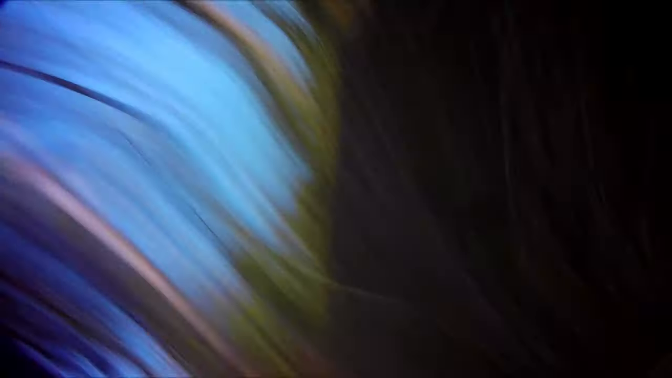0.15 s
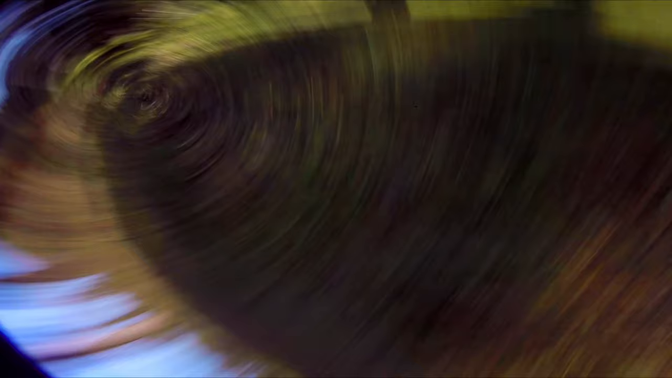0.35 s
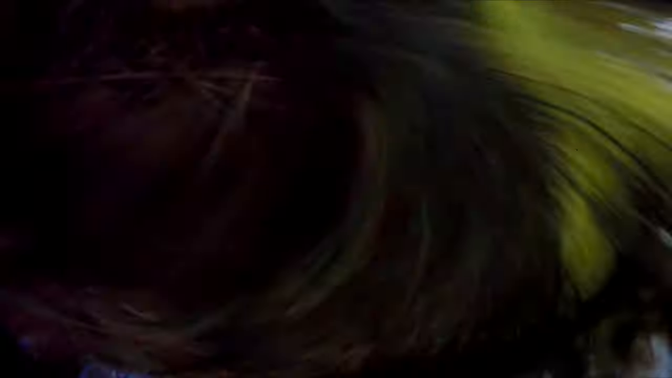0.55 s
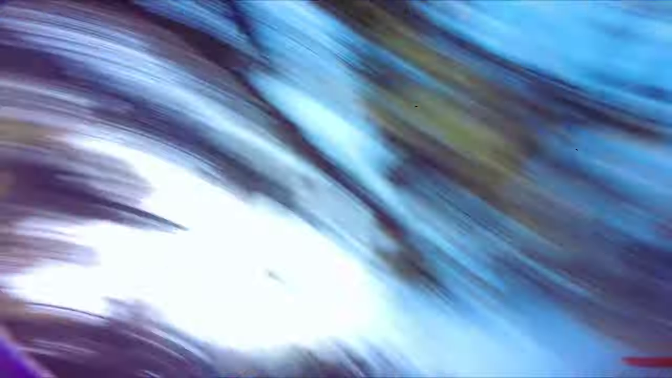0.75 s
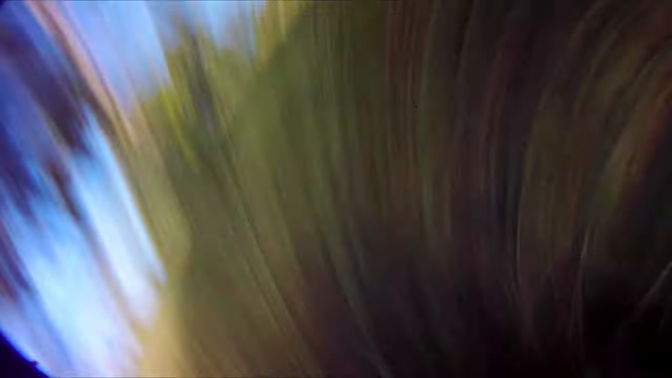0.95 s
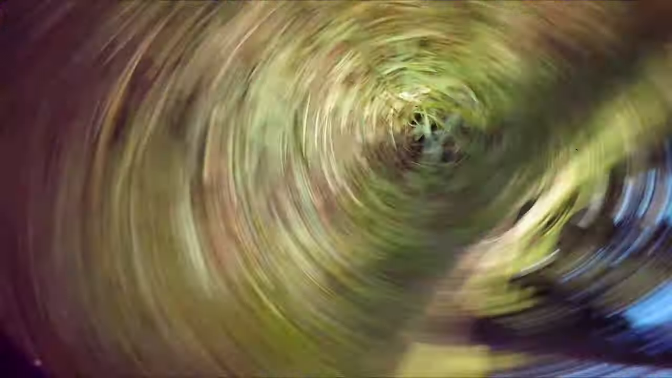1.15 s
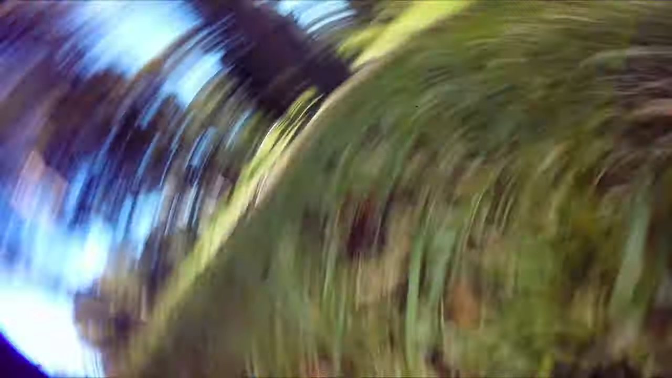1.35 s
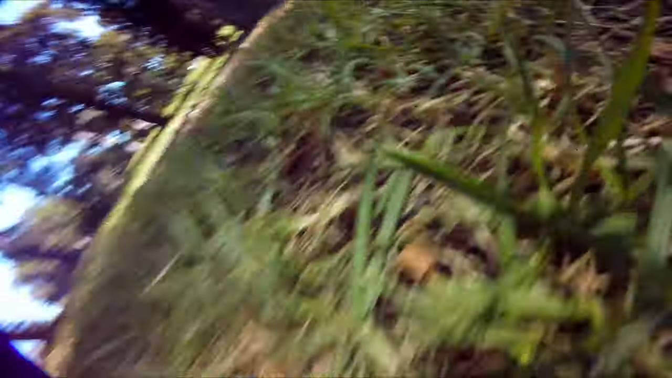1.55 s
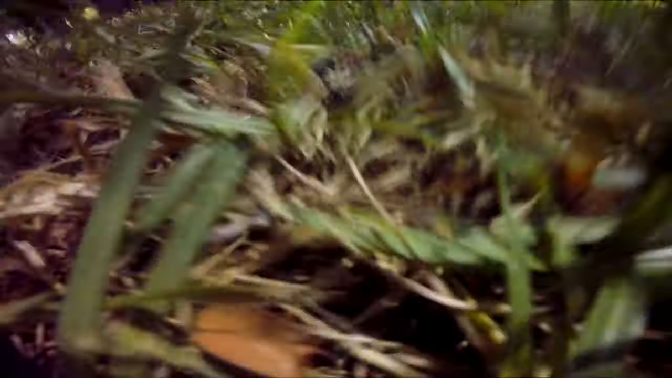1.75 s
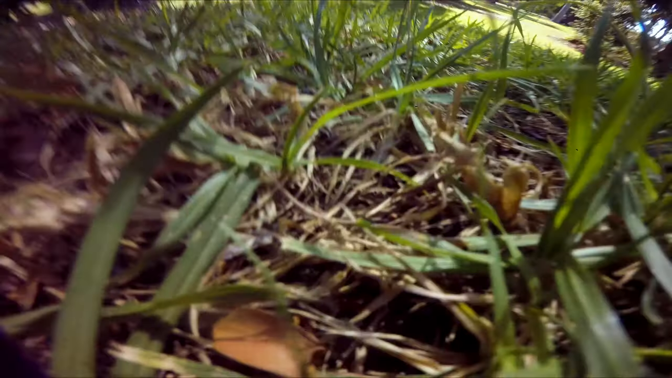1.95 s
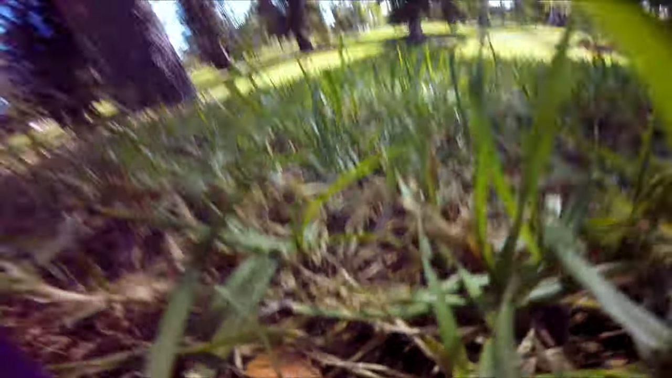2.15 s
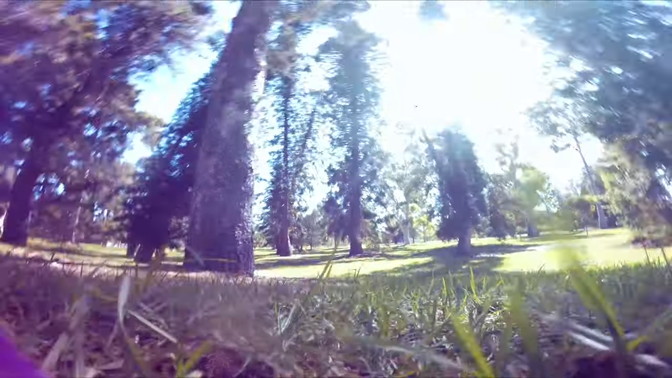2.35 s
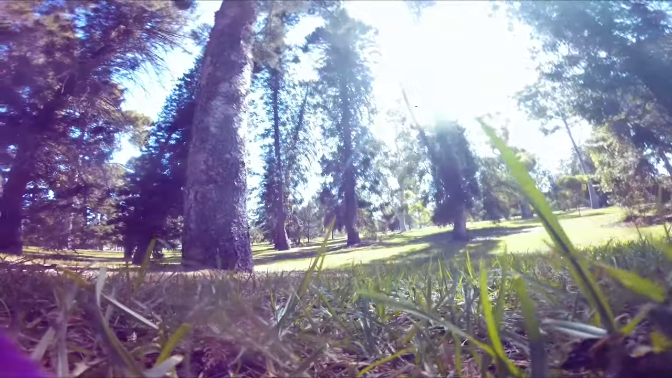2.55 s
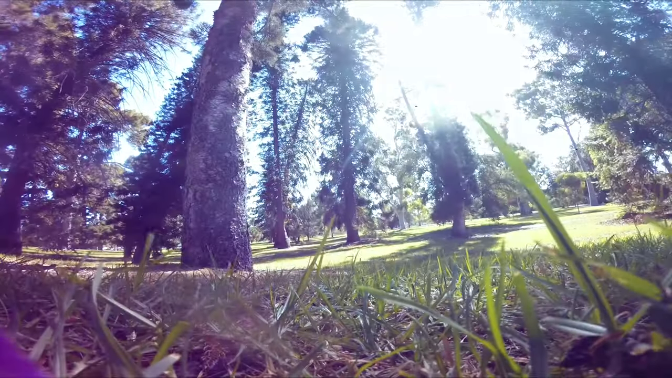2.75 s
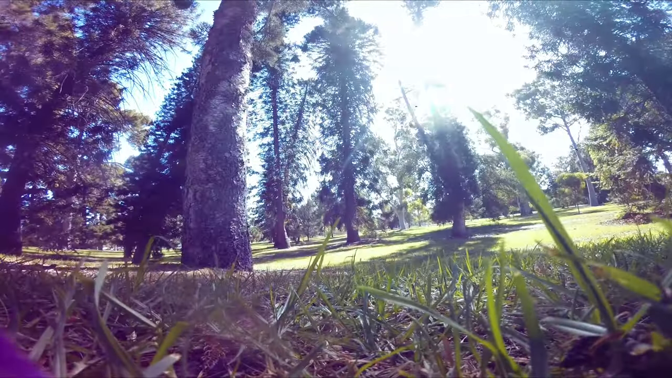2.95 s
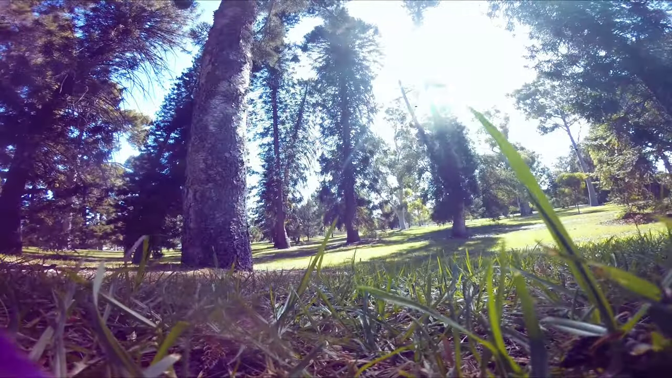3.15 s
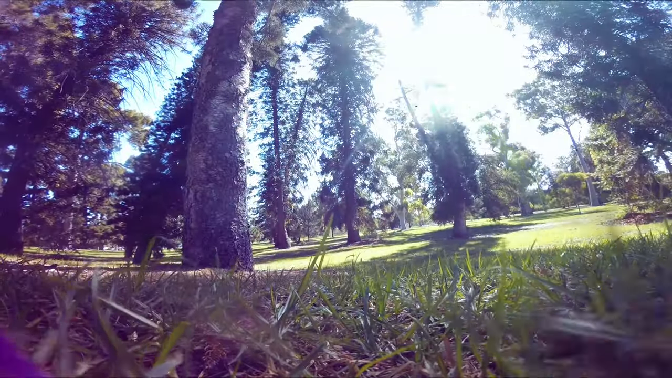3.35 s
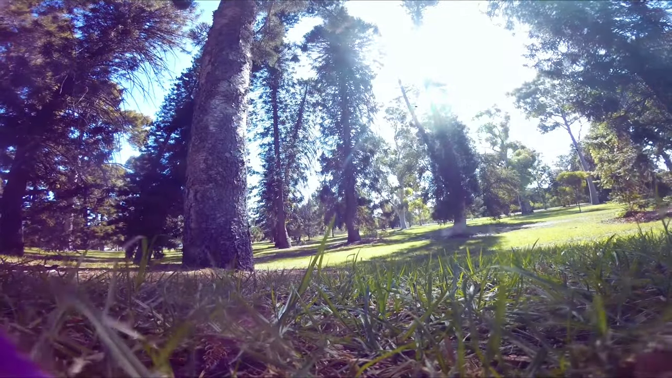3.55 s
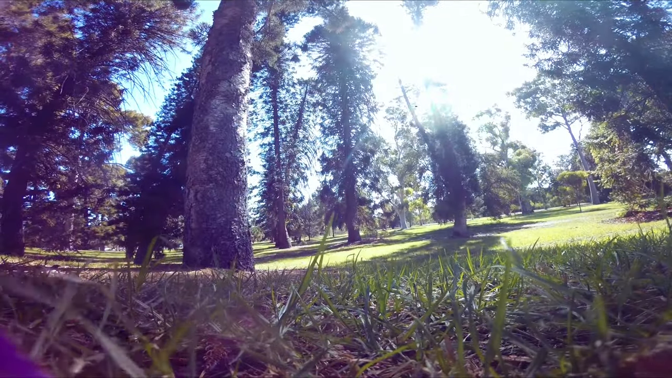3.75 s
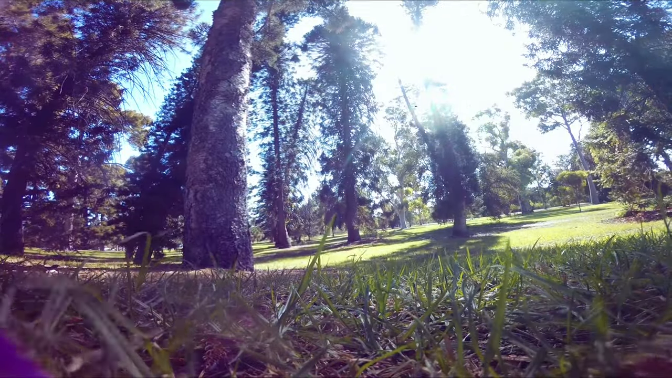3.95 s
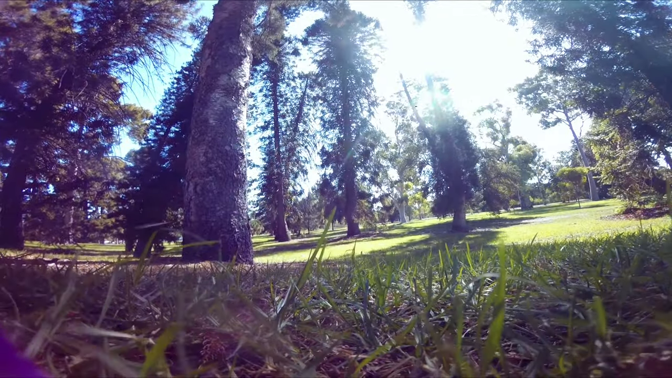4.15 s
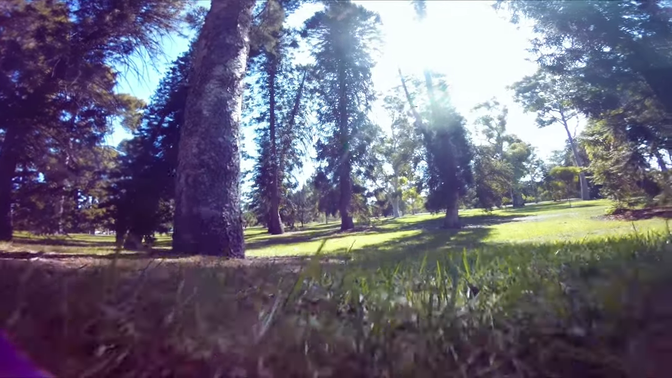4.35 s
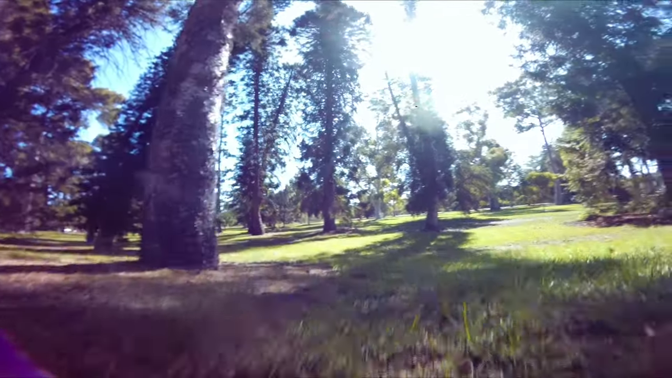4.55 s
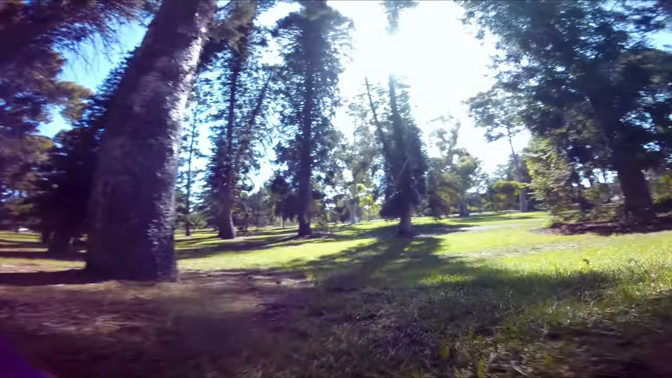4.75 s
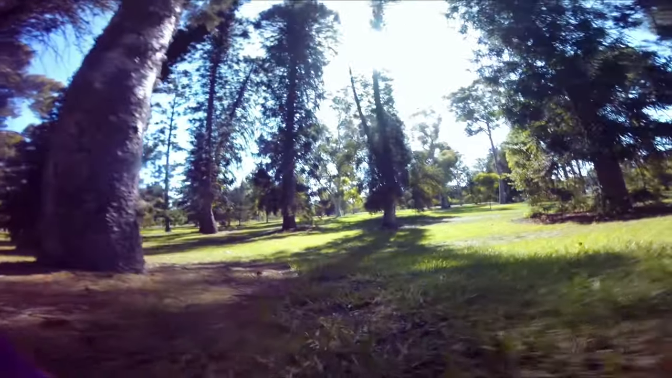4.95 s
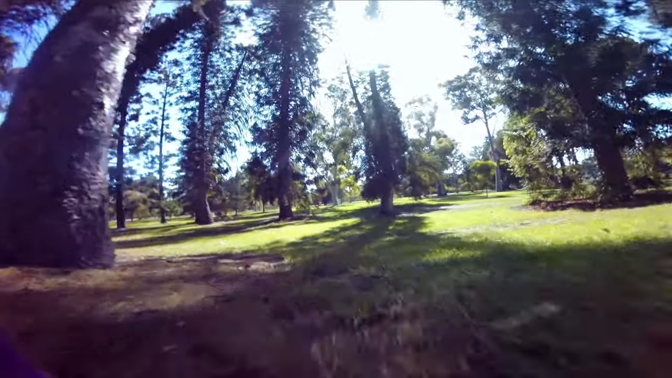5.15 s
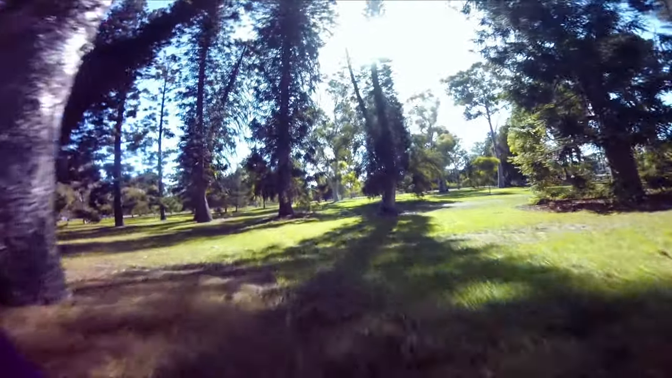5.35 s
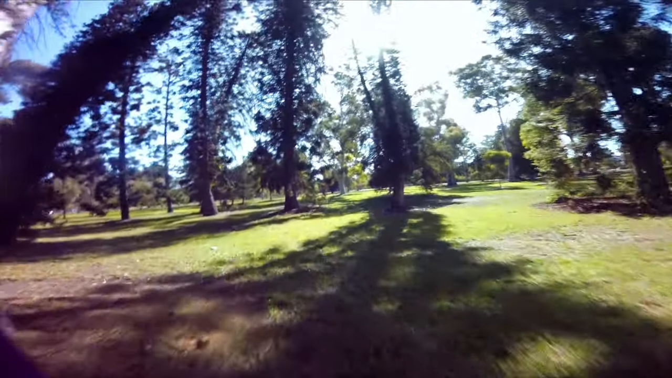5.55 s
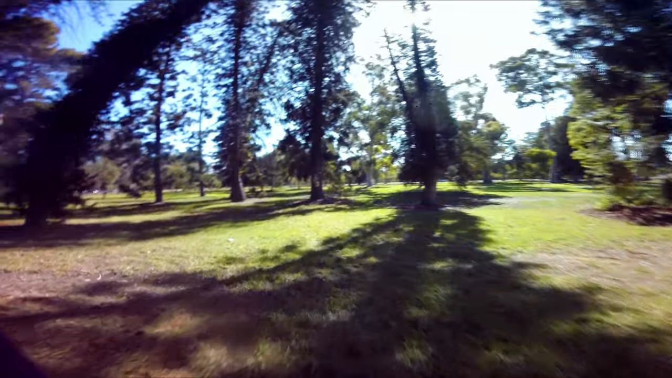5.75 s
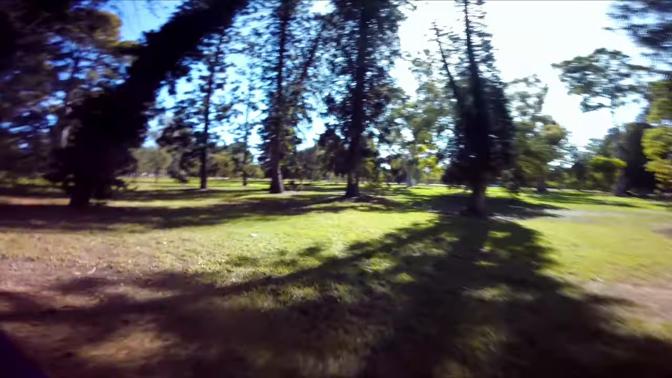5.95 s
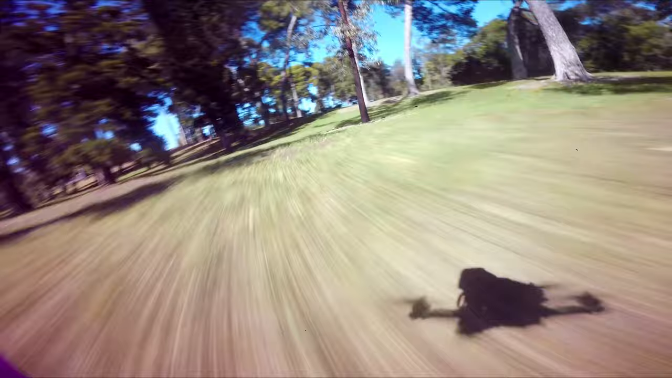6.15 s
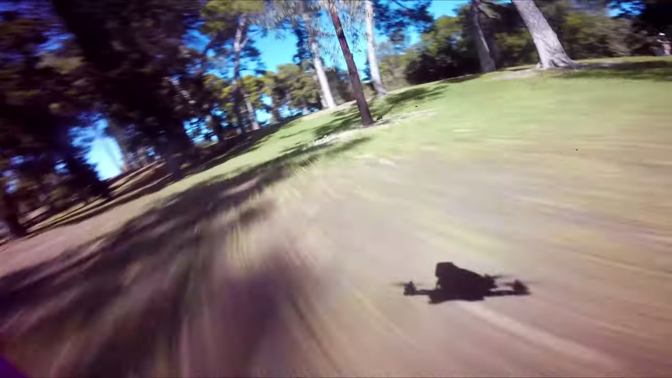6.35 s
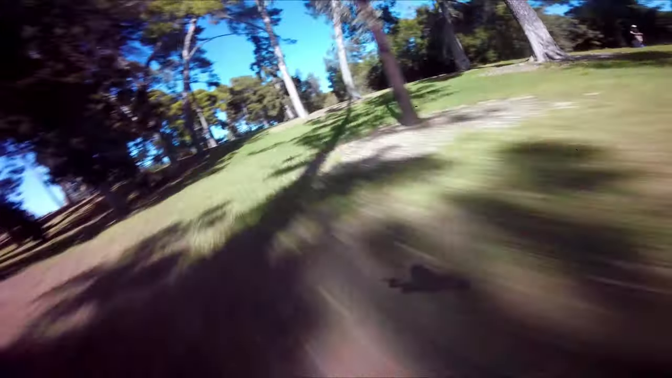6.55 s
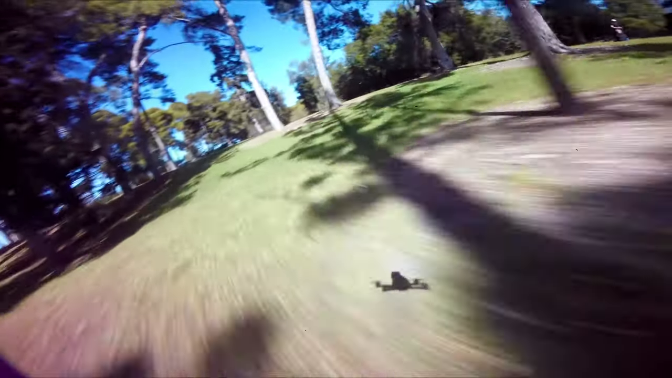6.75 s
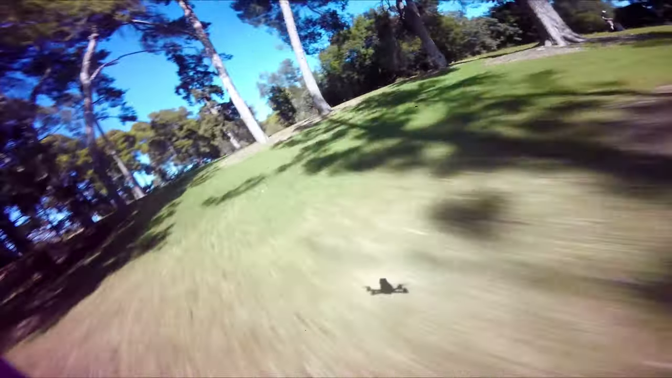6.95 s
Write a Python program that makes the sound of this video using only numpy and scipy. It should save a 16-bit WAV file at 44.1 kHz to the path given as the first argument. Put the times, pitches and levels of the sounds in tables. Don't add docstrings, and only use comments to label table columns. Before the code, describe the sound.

Heard from a microphone fixed to a small quadcopter outdoors: hollow knocks, heavy low jolts, grass scrapes and snapping stalks as it tumbles in bursts and rolls upright. A quiet pause with faint, pulsing motor hum follows. Abruptly the propellers thrash grass, labour and lift off with a buzzing whine that rises, dips and climbs. A final cut brings fast flight, a rough, beating multi-propeller drone with low headwind.

```python
import sys
import numpy as np
from scipy import signal
from scipy.fft import rfft, irfft
from scipy.io import wavfile
from scipy.ndimage import uniform_filter1d, map_coordinates

SR = 44100
rng = np.random.default_rng(int(sys.argv[2]) if len(sys.argv) > 2 else 0)


def transcribe(signal):
    frames = np.atleast_2d(signal).T
    limited = np.clip(frames, -1, 1)
    pcm = np.round(limited * 32767).astype(np.int16)
    wavfile.write(sys.argv[1], SR, pcm)


def how_loud(loudness_db):
    steps = np.asarray(loudness_db, float) / 20
    return 10 ** steps


N = 308700
CHOPPING_S, CRUISE_S = 3.408, 6.215
USUAL_HZ = 190


def curves(rows):
    s, *cols = np.transpose(rows)
    t = np.arange(N) / SR
    gate = np.clip(np.minimum(t - s[0], s[-1] - t) / .0005 + 2.5, 0, 1)
    return [gate] + [np.interp(t, s, c) for c in cols]


def span(start_s, end_s):
    return curves([(start_s, 0), (end_s, end_s - start_s)])


def humps(rows, rise=1):
    t = np.arange(N) / SR
    s, db, fall_s = np.transpose(rows)[..., None]
    fall_s = np.maximum(fall_s, .01)
    coarse = t[::32]
    hold = 0.19
    away = np.maximum((coarse - s) / fall_s - hold, (s - coarse) / (rise * fall_s))
    power = np.sum(how_loud(db - 20 * np.maximum(away, 0)) ** 2, axis=0)
    return np.interp(t, coarse, np.sqrt(power))


def wobble(rate_hz, size=N):
    knots = rng.standard_normal(int(size * rate_hz / SR) + 4)
    return map_coordinates(knots, [np.arange(size) * rate_hz / SR])


def rush(spectrum, band_hz, gain=1):
    f, db = np.transpose(spectrum)
    hz = np.fft.rfftfreq(N, 1 / SR)
    colour = how_loud(np.interp(np.log(hz + 1), np.log(f), db, -120, -120))
    z = rfft(gain * rng.standard_normal(N)) * colour
    inside = np.sum(abs(z[(hz > band_hz[0]) & (hz < band_hz[1])]) ** 2) * 2
    return irfft(z, N) * N / np.sqrt(inside)


def tone(gate, hz, rough, smear_hz, lead_turns=None):
    out, live = np.zeros(N), gate > 0
    start_turns = rng.random() if lead_turns is None else lead_turns
    turn = np.exp(2j * np.pi * (np.cumsum(hz[live]) / SR + start_turns))
    rough = np.clip(rough + 0 * hz, 0, 1)[live]
    flutter = wobble(smear_hz, size=live.sum()) + 1j * wobble(smear_hz, size=live.sum())
    out[live] = np.real(turn * (np.sqrt(2 - 2 * rough) + np.sqrt(rough) * flutter))
    return gate * out


# start_s, shaft_hz, shake_db
NEAR = [(4.08, 99.9, -9), (4.22, 134, -14.5), (4.415, 177, -15.5), (4.44, 188.6, -11.5), (4.6, 198.2, -6.5),
        (4.65, 170.6, -13.5), (4.71, 142, -11), (4.8, 139, -8.5), (4.9, 177.2, -13.5), (4.99, 189.5, -6.5),
        (5.13, 225, -7), (5.25, 243.2, -7), (5.37, 232.7, -5.5), (5.5, 180.7, -11.5), (5.58, 179.9, -10.5),
        (5.86, 199.6, -7.5), (6.06, 201.4, -7.5), (6.214, 213.5, -6)]
# start_s, blade_hz, level_db
LEAD = [(4.86, 480, -24), (4.91, 527, -17), (4.98, 553, -15), (5.06, 617, -18), (5.14, 720, -18),
        (5.22, 712, -20), (5.28, 699, -23), (5.36, 700, -23), (5.42, 619.7, -18), (5.47, 522.3, -20.5),
        (5.58, 504, -20.5), (5.67, 542.5, -20), (5.76, 546.6, -19), (5.85, 576.7, -20), (6.0, 581, -18.5),
        (6.08, 604.2, -17), (6.14, 608.7, -19.5), (6.214, 637, -20.5)]
# start_s, blade_hz, level_db
LEVELLER = [
    (4.07, 398, -18.5),
    (4.2, 485, -17),
    (4.28, 600, -21),
    (4.34, 631, -20),
    (4.42, 640, -20),
    (4.5, 685, -19),
    (4.589, 687, -20),
    (4.68, 562, -32),
    (4.87, 558, -29),
]
# start_s, blade_hz, level_db
SHIELDED = [
    (4.1, 346.5, -20),
    (4.22, 408, -13),
    (4.3, 515.4, -17.5),
    (4.42, 569.4, -19.5),
    (4.47, 625, -19),
    (4.6, 628, -18.5),
    (4.69, 418.4, -20),
    (4.83, 424, -13.5),
    (4.87, 461.6, -22),
]
# start_s, blade_hz, level_db
TRAILER = [
    (4.95, 480, -39),
    (5.18, 617.6, -38),
    (5.33, 642, -34),
    (5.4, 583.6, -37),
    (5.52, 440, -38),
    (5.72, 461, -36),
    (5.96, 516.6, -37),
    (6.214, 563.3, -30.5),
]
# multiple, level_db, turbulent_share
HOVER_ORDERS = [(1, 0, .08), (2, -12.5, .58), (3, -19.5, .7), (4, -29, .8), (5, -35, .92)]
# blade_hz, drift_hz_per_s, level_db, overtone_lift_db
CRUISE_BLADES = [
    (654, 10, -30, 1),
    (647, -16, -26, -1.5),
    (617.4, -12.5, -27, -3),
    (715, 12, -43.5, 13.5),
]
# multiple, level_db, turbulent_share
CRUISE_ORDERS = [(1, 1.5, 0.31), (2, -5.5, 0.9), (3, -14, 0.36), (4, -22.5, .9), (5, -16, 0.93),
                 (6, -28, 0.31)]


def blades():
    t = np.arange(N) / SR
    near_hz = curves(NEAR)[1]
    muffle_db, edge_db = -5, 1.2
    lead_tilt_db = -2 * (t > 5.5)
    lead_turbulence = np.interp(t, (5.36, 5.5), (.5, 1.15))
    partner_gate = span(5.1, CRUISE_S)[0]
    partner = partner_gate, 3.045 * near_hz, -31 + 0.2 * (near_hz - USUAL_HZ)
    hover = [(curves(LEAD), lead_tilt_db, lead_turbulence),
             (curves(LEVELLER), edge_db, .3),
             (curves(SHIELDED), muffle_db, 1),
             (curves(TRAILER), muffle_db, 1),
             (partner, 0, 1)]
    out = np.zeros(N)
    for (gate, hz, db), tilt_db, turbulence in hover:
        tilt_db = tilt_db + .011 * (hz - 3 * USUAL_HZ)
        for k, level_db, rough in HOVER_ORDERS:
            line = tone(gate, k * hz, turbulence * rough, smear_hz=45 * k)
            out += how_loud(db + level_db + (k - 1) * tilt_db) * line

    gate, since_s = span(CRUISE_S, N / SR)
    for hz, drift, db, lift_db in CRUISE_BLADES:
        hz = hz + drift * since_s + 4 * wobble(5)
        db = db + 2.5 * wobble(6)
        for k, level_db, rough in CRUISE_ORDERS:
            line = tone(gate, k * hz, rough, smear_hz=55 * k)
            out += how_loud(db + level_db + lift_db * (k > 1)) * line
    return out


# shaft_hz, drift_hz_per_s, level_db, fade_db_per_s, lead_turns
CRUISE_SHAFTS = [
    (219, -10, -13, -2, .315),
    (211.6, -10, -14, -1, 0),
]
# line_hz, drift_hz_per_s, level_db, fade_db_per_s
CRUISE_OCTAVES = [
    (442.3, -29, -18.5, 3),
    (412, -13.5, -26.5, 9),
]


def shafts():
    gate, near_hz, near_db = curves(NEAR)
    near_twice_db = -28 - 0.0363 * (near_hz - USUAL_HZ)
    lines = [(gate, near_hz, near_db, near_twice_db, .02)]
    gate, hz, db = curves(LEVELLER[2:-2])
    lines.append((gate, hz / 3, db - 4.5, db - 10, .02))
    gate, hz = curves([(CHOPPING_S, 68), (NEAR[0][0], 68)])
    lines.append((gate, hz + 5 * wobble(8), -20, -24, .8))
    out = np.zeros(N)
    for gate, hz, once_db, twice_db, shaken in lines:
        out += how_loud(once_db) * tone(gate, hz, shaken, smear_hz=70)
        out += how_loud(twice_db) * tone(gate, 2 * hz, 0.14 + 0.29 * shaken, smear_hz=30.7)

    faint = [(5.45, .655 * curves(LEAD)[1], -31.5), (5.55, 4 * near_hz, -41)]
    for start_s, hz, db in faint:
        out += how_loud(db) * tone(span(start_s, CRUISE_S)[0], hz, rough=0.18, smear_hz=29.6)

    gate, since_s = span(CRUISE_S, N / SR)
    shaken = .36
    for hz, drift, db, fade, lead_turns in CRUISE_SHAFTS:
        out += how_loud(db + fade * since_s) * tone(gate, hz + drift * since_s, shaken, 69.9, lead_turns)
    for hz, drift, db, fade in CRUISE_OCTAVES:
        out += how_loud(db + fade * since_s) * tone(gate, hz + drift * since_s, shaken / 2, 40.2)
    return out


# start_s, length_s, from_hz, to_hz, level_db
STRAINS = [
    (3.44, .07, 205, 247, -16),
    (3.49, .12, 400, 370, -18),
    (3.6, .08, 350, 240, -13.5),
    (3.47, 0.132, 930, 1060, -26),
    (3.52, 0.067, 980, 800, -23),
    (3.75, 0.063, 820, 940, -24),
    (3.4, .06, 190, 270, -16),
    (3.89, 0.067, 930, 900, -27),
    (4.05, 0.065, 1000, 1090, -25),
]


def strains():
    out = np.zeros(N)
    for s, length_s, from_hz, to_hz, db in STRAINS:
        gate, hz, part = curves([(s, from_hz, 0), (s + length_s, to_hz, 1)])
        swell = np.sqrt(abs(np.sin(np.pi * part)))
        out += how_loud(db) * swell * tone(gate, hz, rough=.25, smear_hz=40)
    return out


# start_s, blade_loading_db, thrown_back_db (by ground or headwind)
AIR = [(3.408, -39, -14.5), (3.49, -37.5, -16), (3.62, -39, -17), (3.75, -40, -19), (3.98, -41, -19.5),
       (4.07, -34.5, -17), (4.17, -34.5, -25.5), (4.35, -30.5, -22.5), (4.55, -32.5, -35),
       (4.82, -38.5, -30.5), (5.05, -31, -33), (5.21, -35, -41.5), (5.49, -42, -35), (6.214, -34, -33),
       (6.216, -38.5, -31.5), (6.66, -34.5, -27.5), (7, -35, -27.5)]
# start_s, level_db, fall_20db_s
BLASTS = [
    (4.3, -20.5, 0.43),
    (5.1, -30, 0.5),
]
HEADWIND = [
    (6.4, -22, 0.99),
]
# freq_hz, level_db_per_hz
BUFFET = [(18, -27), (30, -8), (70, -2.5), (130, -1), (250, -14), (500, -21.5)]
HEADWIND_COLOUR = [(110, -21), (150, 3.5), (210, -5), (290, 0), (360, -12), (450, -25)]
ROAR = [(70, -25), (150, -16), (240, 2), (330, 1), (500, -3), (900, -13), (1400, -21), (2600, -42.5)]
THRASH = [(500, -17), (800, 0), (1000, 5), (1300, -13.5), (2000, -10), (2600, -35)]
TIPS = [(500, 8), (800, -4), (1030, -11), (1300, -3), (1900, -3.5), (2450, -7), (2800, -19), (3500, -22)]
WAKE = [(1500, -22), (2600, 3), (3600, 0), (4600, -4), (5500, -22)]
HISS = [(3500, -24), (4800, -7), (6300, 0.5), (8000, -4.5), (10200, -13), (12000, -27), (13500, -27),
        (15000, -50)]


def downwash():
    gate, load_db, back_db = curves(AIR)
    near_hz = curves(NEAR)[1]
    extra_db = load_db + 36
    in_grass = np.clip((4.2 - np.arange(N) / SR) / 0.18, 0, 1)
    in_air = 1 - in_grass
    throb = in_air * np.cos(2 * np.pi * np.cumsum(near_hz) / SR)
    gust = 0.31 * wobble(9) + 0.9 * in_grass * wobble(28)
    chop = 5.5 * in_grass * np.clip(wobble(350) - .9, 0, 1.2)
    lulls = how_loud(1.5 * wobble(12))

    buffet_db = -25.5 + 0.58 * (back_db + 26)
    tip_db = -33.5 + 0.4 * extra_db - 3 * in_grass - 0.0638 * in_air * (near_hz - USUAL_HZ)
    wake_db = -44.5 + 1.7 * extra_db + 8.7 * in_grass

    roar = how_loud(back_db) * rush(ROAR, (255, 330), how_loud(2.9 * gust + 1.4 * wobble(60)))
    thrash = how_loud(-27.5) * in_grass * rush(THRASH, (700, 1500), how_loud(chop + 2.7 * wobble(68)))
    wind = rush(HEADWIND_COLOUR, (120, 400), how_loud(2.5 * wobble(30)))
    wind = span(CRUISE_S, N / SR)[0] * humps(HEADWIND) * wind
    buffet = np.hypot(how_loud(buffet_db), humps(BLASTS)) * rush(BUFFET, (25, 90), lulls)
    tip_gain = how_loud(chop + 0.43 * gust + 0.41 * wobble(150))
    tips = how_loud(tip_db) * rush(TIPS, (1550, 2500), tip_gain)
    wake_gain = how_loud(chop + 1.5 * gust + 2.05 * wobble(150))
    wake = how_loud(wake_db) * rush(WAKE, (2800, 4600), wake_gain)
    hiss_gain = how_loud(chop + 0.67 * gust + 0.95 * wobble(150) + 1.25 * throb)
    hiss = how_loud(load_db) * rush(HISS, (5000, 10000), hiss_gain)
    return gate * (roar + thrash + wind + buffet + tips + wake + hiss)


# start_s, scrape_db, rustle_db, crackle_db, fall_20db_s
SWEEPS = [(0.171, -29, -36, -37.5, 0.0256), (.212, -38, -56, -65, 0.07), (0.249, -33, -56, -81, 0.05),
          (0.48, -45, -59, -93, 0.37), (0.589, -22, -36, -50, 0.0326), (0.637, -26, -22.5, -32, 0.0286),
          (0.655, -14, -22.5, -32, 0.0172), (0.725, -26.5, -48, -61.5, 0.08), (.45, -41.5, -57.5, -85, 0.1),
          (0.745, -37, -54, -75, 0.2), (.83, -26, -53, -58.5, 0.07), (0.858, -28, -63, -72, 0.08),
          (0.921, -34, -38, -44, 0.0331), (0.942, -25, -31, -39, 0.0152), (.975, -31, -44.5, -51, 0.0343),
          (1.353, -30, -47, -44, 0.003), (1.41, -35.5, -70.5, -67, 0.14), (1.51, -47, -72, -72.5, 0.56),
          (1.83, -25, -62, -76, 0.02), (1.88, -29, -59, -58, 0.02), (2.0, -41.5, -64, -64.5, 0.25),
          (2.12, -29, -65, -64, .08), (2.32, -24.5, -46, -48, 0.0453), (2.21, -29, -54, -59, 0.28),
          (2.366, -17, -45, -47, 0.0739), (2.46, -30.5, -60, -59, 0.22), (2.6, -31, -68, -71.5, 0.04),
          (3.405, -47, -54, -57, 0.12)]
# start_s, scrape_db, rustle_db, crackle_db, fall_20db_s
LANDINGS = [
    (0.102, -34, -53, -58, 0.056),
    (0.568, -43, -46, -55, 0.078),
    (1.337, -20, -37.5, -47, 0.049),
    (1.765, -29, -49, -54.5, 0.19),
    (2.203, -20, -57, -67, 0.024),
]
# start_s, level_db, fall_20db_s
ROCKS = [
    (0.14, -43, 1),
    (0.82, -29, .25),
    (2.2, -26.5, .5),
    (2.46, -20, 0),
    (3.4, -31, 1),
]
STILL_DB = [-61.5, -75, -92]
FANNED_DB = [-46, -52, -68.5]
# freq_hz, level_db_per_hz
RUMBLE = [(15, -8), (30, -10), (70, 3), (130, -6), (300, -25.5)]
SCRAPE = [(80, 1), (170, 6.5), (400, -2), (700, -12.5), (1500, -30)]
RUSTLE = [(300, -15), (600, 4.5), (1000, 4.5), (1500, 0.5), (2400, -3), (3200, -9.5), (4500, -20),
          (6000, -52)]
SPLINTER = [(3000, -1), (4500, -7), (6300, 1.5), (8000, -3), (10200, -11.5), (12000, -26), (13600, -33),
            (15200, -52.5)]


def tumble():
    t = np.arange(N) / SR
    layers = []
    for k in range(3):
        sweeps = humps([(row[0], row[k + 1], row[-1]) for row in SWEEPS], rise=0.73)
        landings = humps([(row[0], row[k + 1], row[-1]) for row in LANDINGS], rise=0.14)
        floor = how_loud(np.interp(t, (1.17, 3.15), [STILL_DB[k], FANNED_DB[k]]))
        layers.append(sweeps + landings + floor)
    scrape, rustle, crackle = layers
    moving = np.clip((2.75 - t) / 1.0, .1, 1)
    clumps = how_loud(moving * (1.95 * wobble(130) + 2.5 * wobble(400)))
    lumps = how_loud(2.5 * moving * wobble(40))
    low = np.hypot(humps(ROCKS), how_loud(-42)) * rush(RUMBLE, (20, 120))
    low += how_loud(-5.0) * scrape * rush(SCRAPE, (200, 600), lumps)
    high = how_loud(-1.0) * rustle * rush(RUSTLE, (800, 3000), clumps)
    high += crackle * rush(SPLINTER, (4500, 10000), clumps)
    balance = how_loud(-9 * np.exp(-((t - 1.948) / .018) ** 2))
    return (t < CHOPPING_S) * (low + balance * high)


# start_s, peak_db, wobble_hz, t60_s
JOLTS = [(0.114, -18, 64, 0.2), (0.13, -9, 63, .13), (0.157, -11, 42.7, 0.37), (0.163, -13, 135, 0.074),
         (0.199, -9, 58, 0.15), (0.585, -3.5, 76.4, 0.14), (0.647, -2.5, 66.7, 0.12),
         (0.908, -7, 51.3, 0.31), (0.939, -1.5, 38.3, 0.11), (0.962, -9, 30, 0.1),
         (1.349, -6.5, 57.8, 0.16), (1.371, -8.5, 52, 0.22), (1.808, -7, 70.0, 0.063),
         (1.87, -16, 114, 0.36), (2.205, -20, 106, 0.19), (2.361, -9, 40, 0.29), (2.408, -7, 45, 0.1),
         (3.41, -8, 72, .2), (2.43, -19.5, 75, 0.46)]


def jolts():
    out, t = np.zeros(N + SR), np.arange(SR // 2) / SR
    for s, db, hz, t60_s in JOLTS:
        swing = np.sin(2 * np.pi * hz * t * (1 - 1.7 * t))
        decay = how_loud(db + 4.5 - 60 * t / t60_s)
        out[round(s * SR):][:len(t)] += decay * (1 - np.exp(-t / 0.0021)) * swing
    return out[:N]


# start_s, peak_db, ring_hz
KNOCKS = [(0.057, -31.5, 420), (0.174, -15, 290), (0.246, -32, 382), (0.437, -32.5, 320),
          (0.589, -9.5, 378), (0.652, -11, 358), (0.682, -14, 359), (0.723, -17, 357), (0.814, -18, 315),
          (0.91, -9.5, 290), (0.939, 1.5, 280), (0.955, 1.5, 269), (0.985, -15.5, 320), (1.336, -12.5, 310),
          (1.407, -18, 392), (1.51, -18, 420), (1.763, -28, 340), (1.805, -13, 276), (1.823, -16, 336),
          (2.099, -24, 383), (2.206, -4.5, 348), (2.304, -20.5, 573), (2.368, -5.5, 350), (2.386, -6, 314),
          (2.456, -19, 417), (2.491, -19, 425), (2.515, -12, 352), (2.603, -19.5, 358), (2.692, -19, 375)]


def knocks():
    out, t = np.zeros(N + SR), np.arange(SR // 10) / SR
    for s, db, hz in KNOCKS:
        ring = how_loud(-60 * t / 0.027) * np.sin(2 * np.pi * hz * t)
        ring += how_loud(-6.5 - 60 * t / 0.023) * np.sin(2 * np.pi * 1.6 * hz * t)
        out[round(s * SR):][:len(t)] += how_loud(db) * ring * (1 - np.exp(-t / 0.0011))
    return out[:N]


# start_s, peak_db, ring_hz
SNAPS = [(0.107, -43, 1420), (0.1653, -28, 2120), (0.1755, -29, 2610), (0.1904, -31, 1380),
         (0.3499, -44, 2400), (0.3641, -42, 1870), (0.3788, -53, 1870), (0.5653, -27, 1570),
         (0.57, -37, 1700), (0.5821, -25, 1700), (0.5872, -28, 2380), (0.5934, -15, 1450),
         (0.5979, -28, 1610), (0.6153, -33, 1890), (0.6268, -26, 2800), (0.6314, -23, 2800),
         (0.636, -10, 1590), (0.6403, -11, 1610), (0.6521, -17, 2390), (0.6551, -18, 2470),
         (0.6592, -19, 2560), (0.6822, -33.5, 2610), (0.6897, -23, 1960), (0.6997, -36, 1550),
         (0.7216, -31, 1460), (0.7715, -24, 1580), (0.8359, -32, 1410), (0.8391, -34, 1460),
         (0.9131, -35, 2070), (0.9298, -12, 1900), (0.9389, -18.5, 2450), (0.9432, -23, 2540),
         (0.9572, -11, 1030), (0.9682, -31, 2650), (0.9838, -43, 2800), (0.9873, -34, 1290),
         (1.0195, -46, 1700), (1.3354, -31, 1006), (1.3395, -27, 1530), (1.3439, -25, 1700),
         (1.3608, -38, 2710), (1.3714, -31, 1140), (1.4045, -35, 1590), (1.4536, -43, 1660),
         (1.5115, -35, 1390), (1.7652, -38, 1010), (1.7932, -31, 1460), (1.8068, -35, 2820),
         (1.8552, -41, 2020), (2.2079, -43, 1010), (2.3189, -39, 1720), (2.3432, -33, 1700),
         (2.3533, -38, 2800), (2.3777, -32, 1010), (2.3862, -27, 1490)]
# start_s, peak_db, ring_hz
CRACKS = [(0.1102, -45, 7970), (0.126, -36, 7450), (0.1541, -39, 2820), (0.162, -29.5, 6400),
          (0.1656, -33, 5100), (0.1694, -27, 6680), (0.1765, -31, 5280), (0.1855, -36, 8000),
          (0.1981, -41, 5880), (0.2108, -49, 2820), (0.353, -48, 7300), (0.5458, -48, 3210),
          (0.5651, -45.5, 6980), (0.584, -34, 4930), (0.5884, -31, 2820), (0.5902, -34.5, 4670),
          (0.5984, -42, 3600), (0.6077, -39, 6700), (0.6197, -35, 6610), (0.628, -28, 3270),
          (0.6374, -18, 6300), (0.6542, -17, 6760), (0.658, -20.5, 6890), (0.6712, -34.5, 4950),
          (0.688, -35, 2820), (0.7202, -45.5, 4240), (0.7713, -38, 5400), (0.9089, -42, 3810),
          (0.9184, -32, 3170), (0.931, -27, 2820), (0.9431, -17, 2820), (0.954, -24, 3270),
          (0.9699, -30, 3190), (0.9829, -34, 3170), (0.9864, -37, 5660), (1.342, -38, 6630),
          (1.3565, -23, 5460), (1.361, -26.5, 4840), (1.778, -30, 6070), (1.7906, -40, 6400),
          (1.7946, -38, 6120), (1.805, -40, 3080), (2.247, -44, 6290), (2.3189, -48, 5530),
          (2.3542, -32, 6930), (2.4504, -45, 7520), (2.5589, -40, 8230), (2.6114, -48, 6500),
          (3.3857, -46, 4390), (3.3967, -27.5, 4350)]
# start_s, end_s, peak_db
TICKING = [
    (.35, 0.38, -47),
    (0.038, .045, -40.5),
    (2.492, 2.5, -35.5),
    (1.262, 1.32, -56),
]


def snaps():
    out, t = np.zeros(N + SR), np.arange(SR // 40) / SR
    rows = list(SNAPS)
    for start_s, end_s, db in TICKING:
        rows += [(s, db, 1500) for s in np.arange(start_s, end_s, 1 / 69.5)]
    for s, db, hz in rows:
        noise = rng.standard_normal(len(t))
        push = how_loud(-60 * t / 0.0045) * np.sin(2 * np.pi * hz * t)
        dull = uniform_filter1d(uniform_filter1d(noise, size=4), size=5)
        spit = how_loud(-9 - 60 * t / 0.015) * dull * (1 - np.exp(-t / .0002))
        out[round(s * SR):][:len(t)] += how_loud(db + 3.0) * (push + spit)
    for s, db, hz in CRACKS:
        noise = rng.standard_normal(len(t))
        bright = uniform_filter1d(uniform_filter1d(noise, size=2), size=3)
        ring = np.sin(2 * np.pi * hz * t) + how_loud(2.0) * bright
        decay = how_loud(db + 4.0 - 60 * t / 0.0034)
        out[round(s * SR):][:len(t)] += decay * ring * (1 - np.exp(-t / 0.00014))
    return signal.sosfilt(signal.butter(3, 11500, fs=SR, output='sos'), out[:N])


# shaft_hz, start_s, end_s
IDLE = [
    (68.2, 0, 1.2),
    (52, 1.54, 5),
    (52, 2.5, 12),
    (52, 2.5, 12),
]
# multiple, level_db
IDLE_ORDERS = [
    [(1, 7), (2, -11)],
    [(1, -7.5), (2, 4.5)],
    [(3, 2.5), (4, -11)],
    [(5, -5.5), (6, -16), (7, -23)],
]
# start_s, level_db, fall_20db_s
SURGES = [
    [(0, -32, 0.56), (1.33, -41.5, 0.43)],
    [(1.4, -34.5, 0.32), (1.9, -26, 0.13), (2.6, -30.5, 0.25), (2.92, -29, 0.091), (3.08, -32.5, 0.17),
     (3.4, -33, 0.39)],
    [(2.72, -40.5, 0.4), (2.97, -35, 0.53)],
    [(2.95, -39.5, 0.53), (3.25, -33.5, 0.53)],
]


def idling():
    out = np.zeros(N)
    for (hz, start_s, end_s), surges, orders in zip(IDLE, SURGES, IDLE_ORDERS):
        gate, speed_hz = curves([(start_s, hz), (end_s, hz)])
        hum = sum(how_loud(db) * tone(gate, k * speed_hz, rough=0.11, smear_hz=13.27) for k, db in orders)
        out += humps(surges) * hum
    return out


# start_s, level_db, fall_20db_s
CHATTER = [
    (5.52, -50, 0.5),
]
# freq_hz, level_db_per_hz
BEARING = [(8000, -33), (9300, -4), (10000, 0), (11000, -6), (13500, -18), (15000, -33)]


def bearing():
    turn = np.cos(2 * np.pi * np.cumsum(curves(LEAD)[1] / 3) / SR)
    out = humps(CHATTER, rise=0.5) * rush(BEARING, (8000, 15000), np.maximum(turn, 0) ** 3)
    out[round(CRUISE_S * SR)] += how_loud(-20)
    return out


def scene():
    opening = np.clip(np.arange(N) / SR / .003, .1, 1)
    flight = blades() + shafts() + strains() + downwash()
    crash = tumble() + jolts() + knocks() + snaps()
    return (opening * (flight + crash + idling() + bearing()))[None]


def roll_off(x):
    return signal.sosfilt(signal.butter(12, 15370, fs=SR, output="sos"), x)


def record(dry):
    top, hardness = .97, 5.5
    dry = signal.sosfilt(signal.butter(1, 8, 'high', fs=SR, output='sos'), dry)
    mix = dry / (1 + abs(dry / top) ** hardness) ** (1 / hardness)
    return roll_off(mix)


dry = scene()
out = record(dry)
transcribe(out)
```